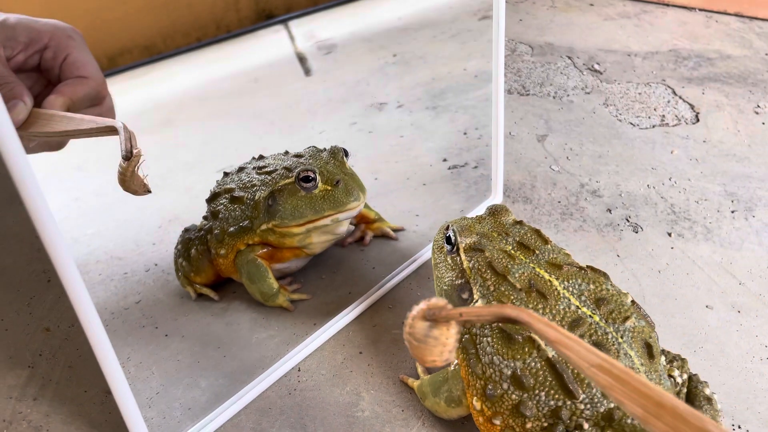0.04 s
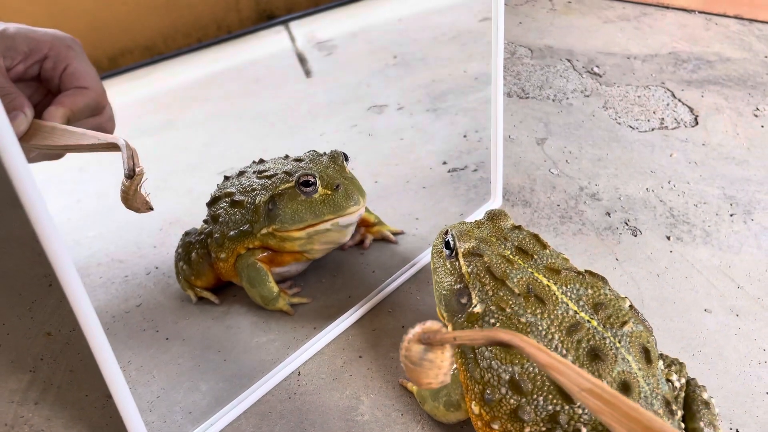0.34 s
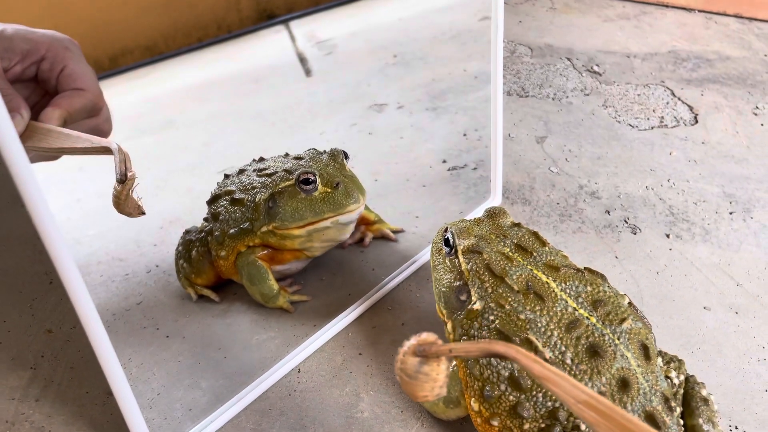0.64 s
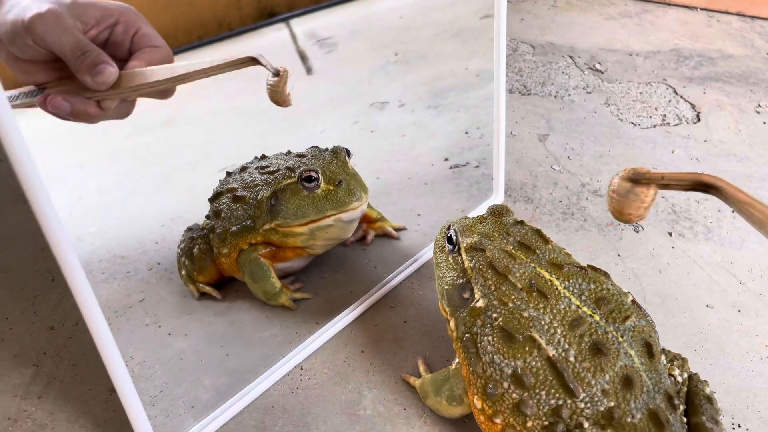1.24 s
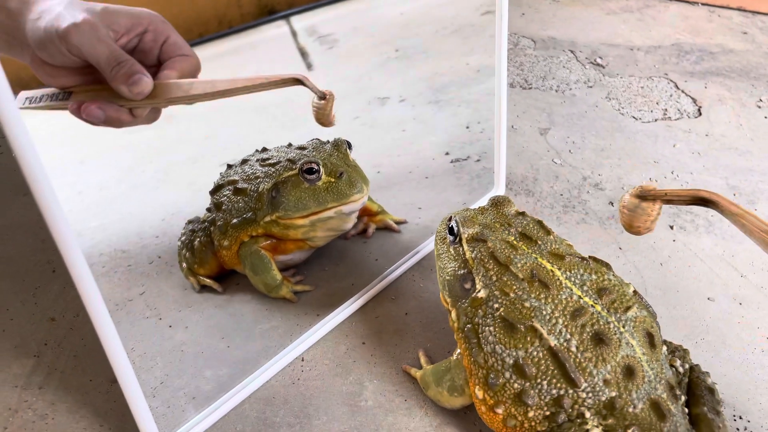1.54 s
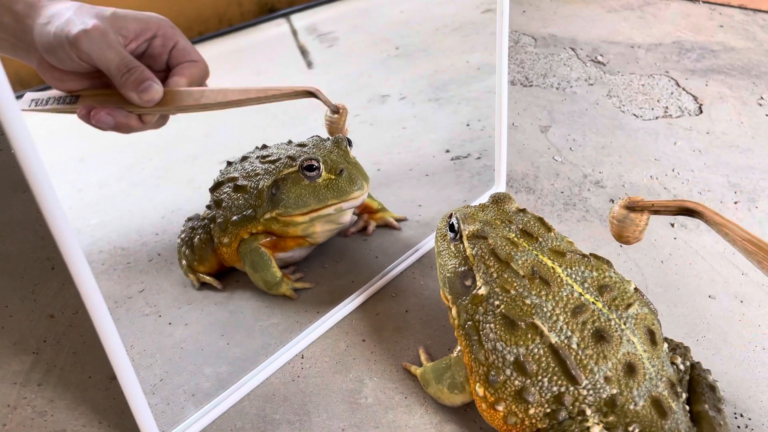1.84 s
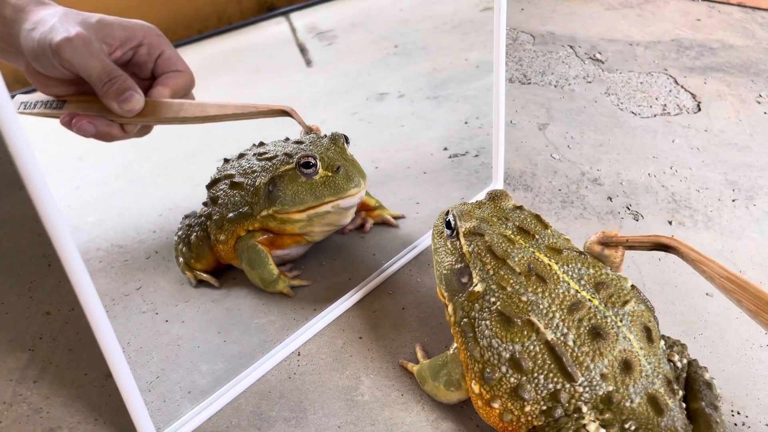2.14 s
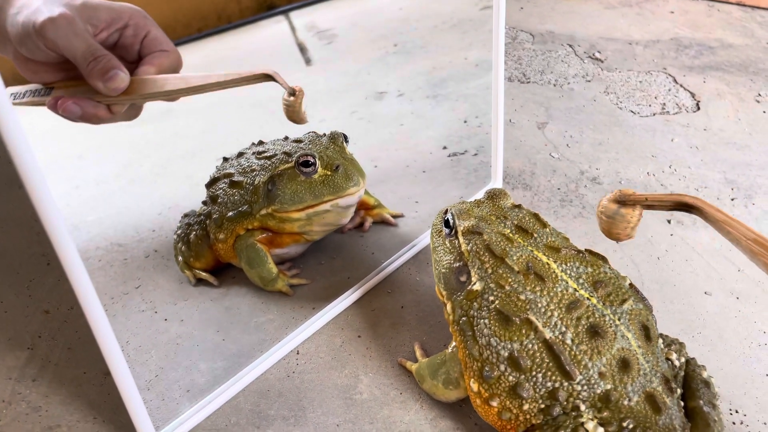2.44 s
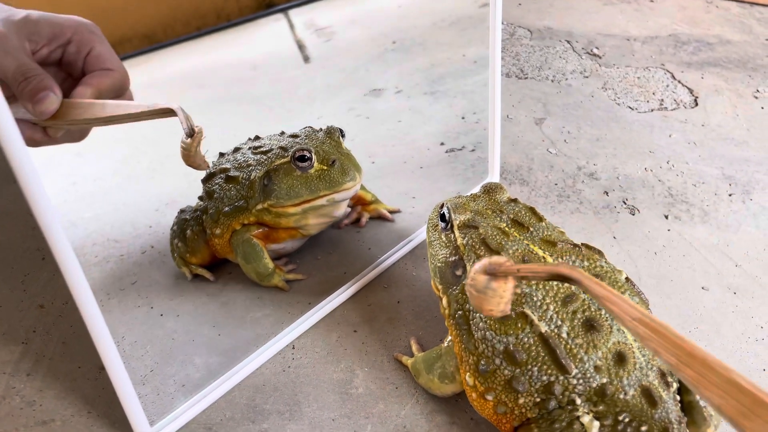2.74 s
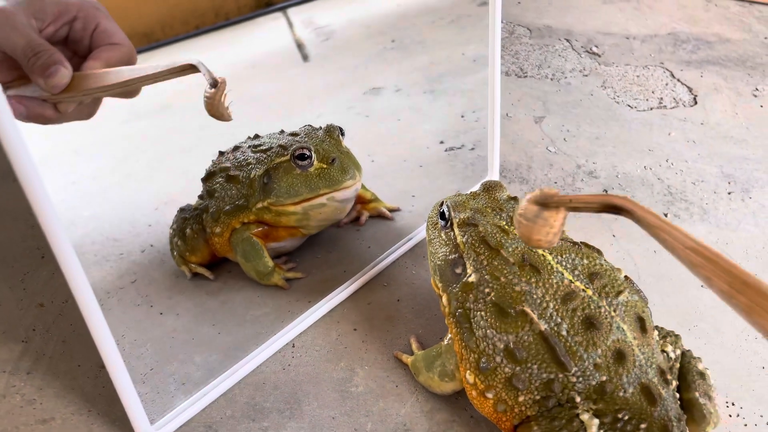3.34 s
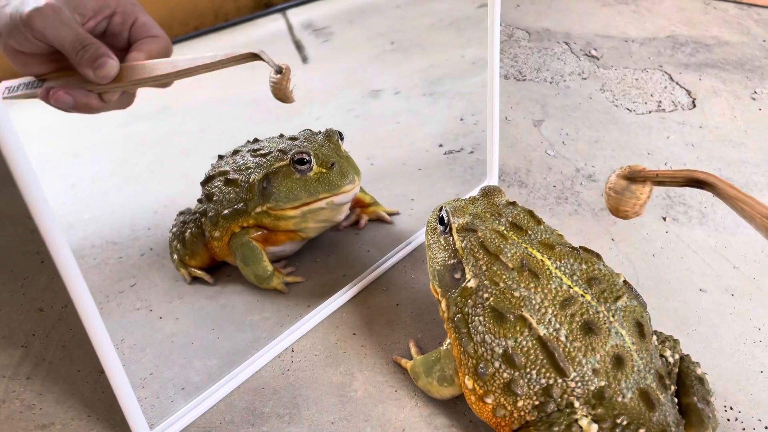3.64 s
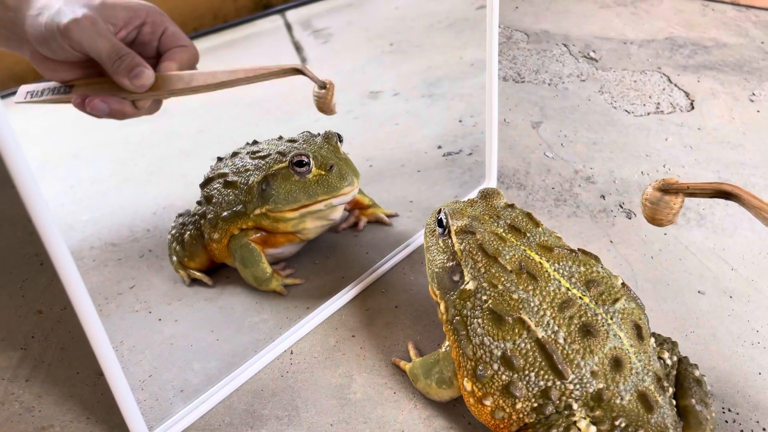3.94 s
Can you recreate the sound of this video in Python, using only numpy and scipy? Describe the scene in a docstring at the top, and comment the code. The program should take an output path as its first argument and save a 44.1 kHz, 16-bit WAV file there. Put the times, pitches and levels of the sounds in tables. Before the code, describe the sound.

A low rumble of far traffic and faint hum, then soft thumps on the microphone.

```python
"""Distant traffic rumbles in a quiet, sheltered spot, with a machine hum and a faint electrical whine.
Soft rustles come and go as someone slowly waves wooden feeding tongs before a silent frog.
Late on, a draught or handling buffets the microphone, with a few dull thumps.
Traffic, rustles and buffeting are shaped noise; hum and whine are wavering sines;
thumps are short, low tone pulses."""
import sys
import numpy as np
from scipy.fft import rfft, irfft, next_fast_len
from scipy.io import wavfile
from scipy.ndimage import map_coordinates

SR = 44100
rng = np.random.default_rng(int(sys.argv[2]) if len(sys.argv) > 2 else 0)


def int16_out(signal):
    """Quantize to a 16-bit WAV file."""
    q = np.round(np.clip(np.atleast_2d(signal).T, -1, 1) * 32767)
    wavfile.write(sys.argv[1], SR, q.astype(np.int16))


N = 176400

# Each row: frequency in Hz, relative spectral density in dB.
RUMBLE_SPECTRUM = [(25, -31), (36, -18.5), (49, -1), (60, -3), (88, -2), (108, -4), (130, -4.5), (165, -11),
                   (215, -12.5), (260, -14.5), (350, -26.5), (460, -46), (770, -120)]
AIR_SPECTRUM = [(200, -6.5), (300, -3), (440, 0.5), (530, -5), (640, -5), (770, -8.5), (960, -10),
                (1130, -10), (1420, -13.5), (1780, -12), (2100, -17.5), (3100, -25.5), (3700, -25.5),
                (4500, -33.5), (5400, -32), (5900, -38.5), (7500, -35), (9500, -48.5), (12000, -53),
                (15500, -51.5)]
# Each row: time in seconds, level in dB (air: before air_gain_db).
RUMBLE_ENVELOPE = [(0, -49.5), (.3, -44), (.8, -42), (1.3, -44.5), (1.7, -45), (2.05, -42), (2.55, -47.5),
                   (3, -44.5), (4, -44.5)]
AIR_ENVELOPE = [(0, -56.5), (.8, -58), (1.5, -57.5), (2.1, -58), (2.55, -58.5), (3.05, -58.5),
                (3.35, -57.5), (3.65, -58.5), (4, -58)]
TYRE_ENVELOPE = [(0, -65), (.7, -61), (1.3, -65.5), (2.05, -64.5), (2.5, -67), (3.2, -64), (4, -66.5)]


def traffic(air_gain_db=2.5, tyre_hz=1000):
    """Far traffic swells and ebbs: deep rumble, a soft wash of air, hollow tyre hiss."""
    rumble_db = curve(RUMBLE_ENVELOPE) + 0.58 * wobble(rate_hz=2.8)
    rumble = amp(rumble_db) * stereo_noise(colour(RUMBLE_SPECTRUM))
    air_db = air_gain_db + curve(AIR_ENVELOPE) + 0.44 * wobble(rate_hz=7)
    air = amp(air_db) * wall_echoes(stereo_noise(colour(AIR_SPECTRUM)))
    tyres = amp(curve(TYRE_ENVELOPE)) * wall_echoes(stereo_noise(band(tyre_hz, sigma_oct=0.2)))
    return rumble + air + tyres


# Each row: time in seconds, level in dB.
BUFFET_ENVELOPE = [(0, -64), (2.55, -58.5), (2.69, -37), (2.8, -43), (2.9, -41), (3.1, -49), (3.22, -36),
                   (3.31, -43), (3.42, -30), (3.52, -31), (3.62, -34), (3.71, -35.5), (3.8, -36.5),
                   (4, -38)]
# Each row: frequency in Hz, relative spectral density in dB.
BUFFET_SPECTRUM = [(20, -19), (29, -7), (40, -4), (56, 3.5), (80, -8.5), (120, -11.5), (180, -19),
                   (300, -37), (600, -63.5), (1200, -120)]


def buffeting(lumps_db=1, flap_max_db=-46.5, flap_db_per_db=2.6, flap_hz=174.5):
    """Lumpy low pressure on the microphone, with a higher flapping at its strongest."""
    level_db = curve(BUFFET_ENVELOPE)
    lumps = amp(level_db + lumps_db * wobble(rate_hz=28)) * stereo_noise(colour(BUFFET_SPECTRUM))
    flap_db = flap_max_db + flap_db_per_db * (level_db - level_db.max())
    return lumps + amp(flap_db) * stereo_noise(band(flap_hz, sigma_oct=0.32))


# Each row: centre in seconds, pitch in Hz, peak in dB, 1/e half-width in seconds.
THUMP_PULSES = [(3.366, 67.6, -32, 0.0072), (3.426, 80, -27, 0.011), (3.481, 83, -17.5, 0.011),
                (3.701, 71, -28, 0.029)]


def thumps():
    """Soft pushes on the microphone: low cosines under Gaussian envelopes."""
    out = np.zeros(N)
    for centre_s, hz, peak_db, half_width_s in THUMP_PULSES:
        t = time_s() - centre_s
        out += amp(peak_db) * np.exp(-(t / half_width_s) ** 2) * np.cos(2 * np.pi * hz * t)
    return out


# Each row: frequency in Hz, rms level in dB, phase jitter in radians.
HUM_TONES = [(26, -56.5, .3), (49.55, -54.5, 0.28), (73.34, -48.5, .3), (97.4, -53.5, .6),
             (126.95, -55, 0.29), (180.8, -54, 0.17), (213.7, -65, 0.58), (264.3, -68.5, 0.61),
             (400.2, -69.5, .8)]


def machine_hum():
    """A machine drones on low, slightly unsteady tones."""
    return tones(HUM_TONES, spread_rad=0.26)


# Each row: time in seconds, level in dB.
RUSTLE_ENVELOPE = [(0, -75), (.17, -80.5), (.35, -74.5), (.55, -79.5), (.74, -74), (.95, -77.5),
                   (1.35, -77.5), (1.52, -81.5), (1.75, -78), (2.0, -77), (2.15, -80), (2.3, -77.5),
                   (2.48, -81.5), (4, -89)]
# Each row: frequency in Hz, relative spectral density in dB.
RUSTLE_SPECTRUM = [(1200, -11), (2500, 7), (5000, 4), (7500, 0), (9500, -0.5), (12000, -13), (15500, -10)]
# Each row: centre in seconds, length in seconds, level in dB, band centre in Hz.
BRUSH_STROKES = [(1.162, .11, -79, 9500), (1.192, 0.24, -74, 3680), (2.353, 0.043, -70, 3300),
                 (3.32, 0.074, -72, 1900), (3.56, 0.073, -64.5, 1050), (3.744, 0.065, -71.5, 2600)]


def rustles(grain_db=1.5):
    """Slow movement makes a fine-grained hiss and a few short brushes."""
    hiss_db = curve(RUSTLE_ENVELOPE) + grain_db * wobble(rate_hz=70)
    out = amp(hiss_db) * stereo_noise(colour(RUSTLE_SPECTRUM))
    for centre_s, length_s, level_db, hz in BRUSH_STROKES:
        gain = amp(level_db + grain_db * wobble(rate_hz=90))
        envelope = np.exp(-2 * ((time_s() - centre_s) / length_s) ** 2)
        out += gain * envelope * stereo_noise(band(hz, sigma_oct=0.65))
    return out


# Each entry: frequency in Hz.
WHINE_PITCHES_HZ = [3688.5, 3849, 3875, 7510]
# Each row: rms level in dB, phase jitter in radians, for the matching pitch.
WHINE_TONES = [(-85.5, 0.98), (-90.5, 0.34), (-94, 0.32), (-103, 0.45)]


def electrical_whine():
    """Faint, thin electrical tones waver in the treble."""
    return tones(np.column_stack([WHINE_PITCHES_HZ, WHINE_TONES]), spread_rad=0.79)


def tones(rows, spread_rad, waver_hz=5, waver_db=1):
    """Wavering sines; the room shifts their phase between the ears by about spread_rad."""
    out = np.zeros((2, N))
    for hz, rms_db, jitter_rad in rows:
        phase = 2 * np.pi * (hz * time_s() + rng.random()) + jitter_rad * wobble(waver_hz)
        ear_phase = spread_rad * wobble(rate_hz=0.89) * np.array([[.5], [-.5]])
        peak = np.sqrt(2) * amp(rms_db + waver_db * wobble(waver_hz))
        out += peak * np.sin(phase + ear_phase)
    return out


def wall_echoes(x, echo_db=-21, cutoff_hz=2500, count=8):
    """Weak, dull echoes off nearby surfaces comb each ear differently. Output rms is 1."""
    delays_s = rng.uniform(0.001967, 0.02, (count, 2, 1))

    def response(hz):
        echoes = sum(np.exp(-2j * np.pi * hz * delay_s) for delay_s in delays_s)
        return 1 + amp(echo_db) * echoes / (1 + (hz / cutoff_hz) ** 2)
    return unit_rms(filtered(x, response))


# Each row: frequency in Hz, left-right correlation before clipping.
BASS_CORRELATION = [(50, .9), (130, .91)]
UPPER_CORRELATION = [(290, 0.75), (420, 0.44), (650, -0.22), (800, 0.38), (1030, 0.083), (1130, -0.18),
                     (1280, 0.32), (1800, -0.18), (2500, 0.46), (6400, .45), (7800, -1), (8900, -0.96),
                     (10500, .97), (12500, 0.93), (14000, -1.1)]
# Each row: frequency in Hz, left minus right in dB.
BALANCE = [(100, 0), (400, 0.5), (800, -0.1), (1500, 2.5), (5200, 2.5), (6200, -0.5)]


def stereo_noise(gain):
    """Noise of rms 1, coloured by gain(hz), as two microphone ports hear it."""
    def mid_side_gain(hz):
        correlation = log_interp(np.vstack([BASS_CORRELATION, UPPER_CORRELATION]), hz)
        angle = np.arccos(np.clip(correlation, -.98, .98)) / 2
        return gain(hz) * np.array([np.cos(angle), np.sin(angle)])
    mid, side = filtered(rng.standard_normal((2, N)), mid_side_gain)
    ears = np.array([mid + side, mid - side])
    return unit_rms(filtered(ears, lambda hz: amp(log_interp(BALANCE, hz) * np.array([[.5], [-.5]]))))


def colour(points):
    """Response through (Hz, dB) points, falling steeply below the first."""
    return lambda hz: amp(log_interp(points, hz)) * np.minimum(hz / points[0][0], 1) ** 3


def band(centre_hz, sigma_oct):
    """Gaussian response on an octave axis."""
    return lambda hz: np.exp(-.5 * (np.log2((hz + 1) / centre_hz) / sigma_oct) ** 2)


def filtered(x, response):
    """Zero-padded FFT filter with gain response(hz)."""
    size = next_fast_len(N + SR // 4)
    return irfft(rfft(x, size) * response(np.fft.rfftfreq(size, 1 / SR)), size)[..., :N]


def wobble(rate_hz):
    """Smooth random curve with rate_hz knots a second."""
    return map_coordinates(rng.standard_normal(512), [time_s() * rate_hz + 2], mode="wrap")


def curve(points):
    """(Seconds, value) points joined by lines."""
    return np.interp(time_s(), *np.transpose(points))


def log_interp(points, hz):
    """(Hz, value) points read on a log axis."""
    knots_hz, values = np.transpose(points)
    return np.interp(np.log(hz + 1), np.log(knots_hz + 1), values)


def time_s():
    return np.arange(N) / SR


def amp(db):
    return 10 ** (np.asarray(db) / 20)


def unit_rms(x):
    return x / np.sqrt(np.mean(x ** 2) + 1e-20)


def scene():
    """All layers at the microphone."""
    return electrical_whine() + traffic() + machine_hum() + rustles() + buffeting() + thumps()


def record(dry, fade_s=0.004, cutoff_hz=15750):
    """Short fades at both ends, then a brick-wall low-pass."""
    edge_distance_s = np.minimum(time_s(), time_s()[::-1])
    fade = np.minimum(edge_distance_s / fade_s, 1)
    return filtered(dry * fade, lambda hz: hz < cutoff_hz)


dry = scene()
out = record(dry)
int16_out(out)
```